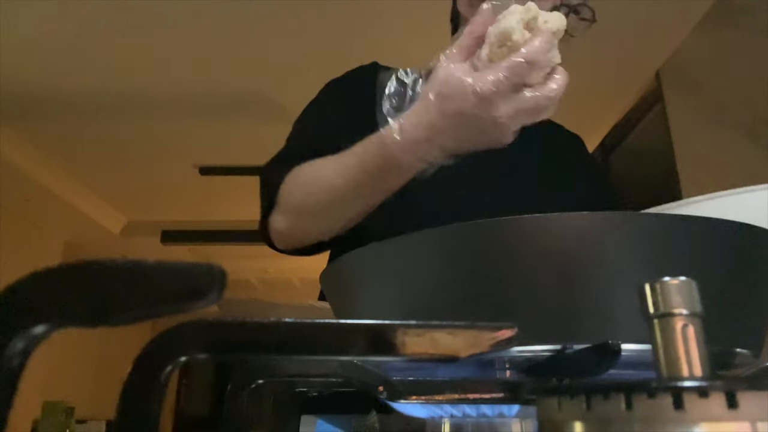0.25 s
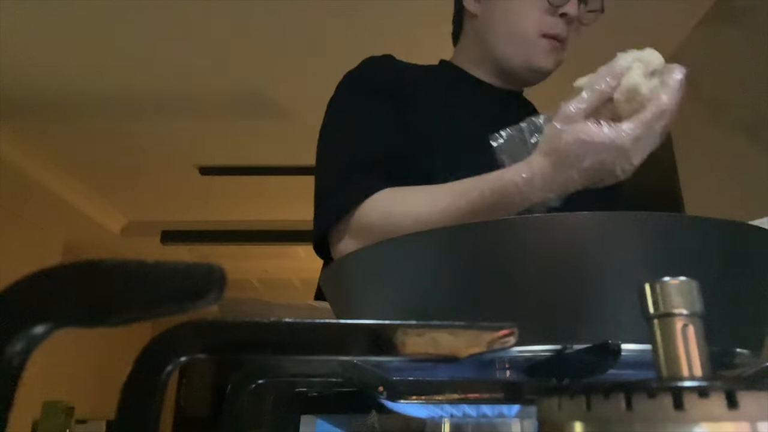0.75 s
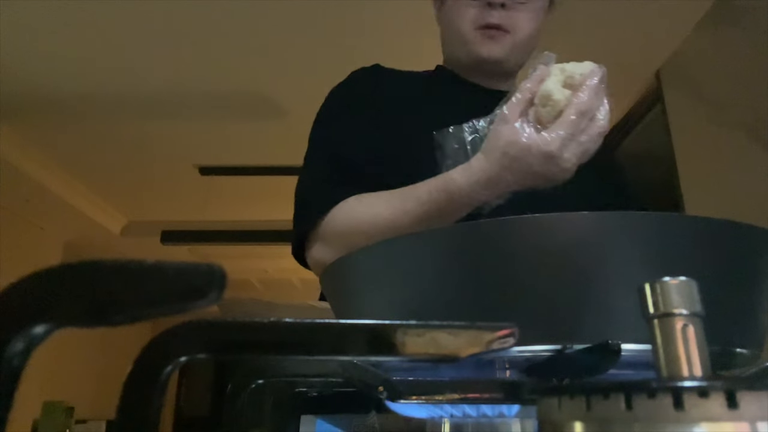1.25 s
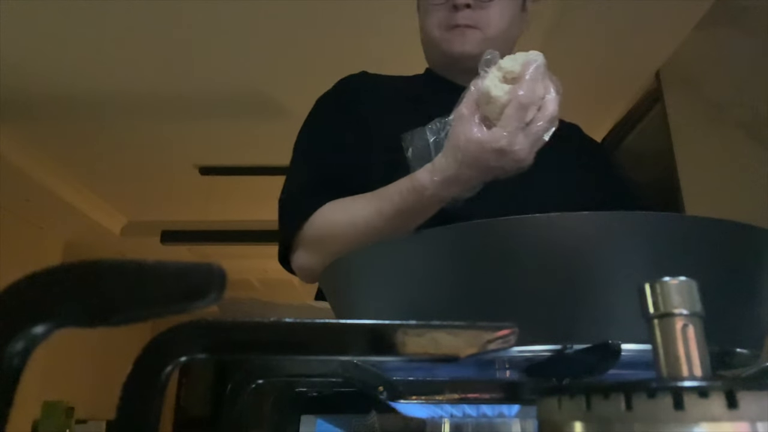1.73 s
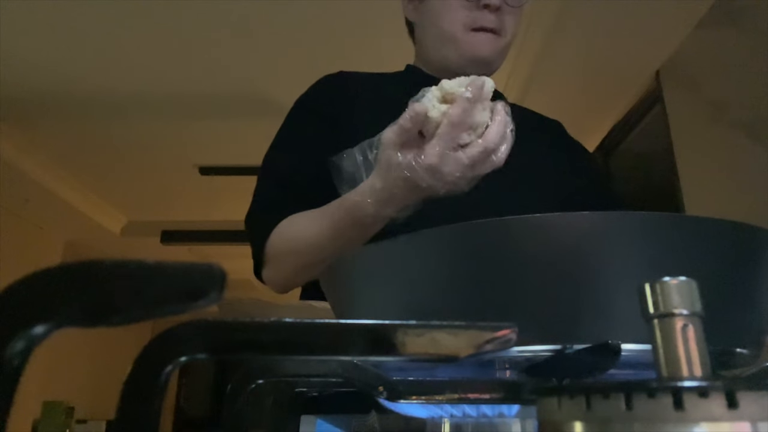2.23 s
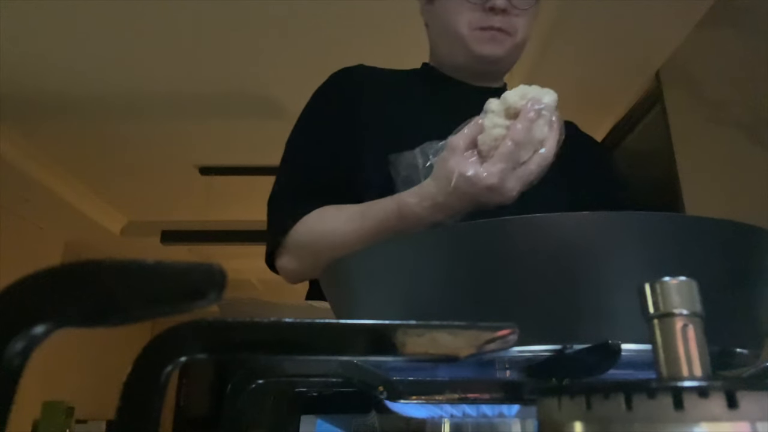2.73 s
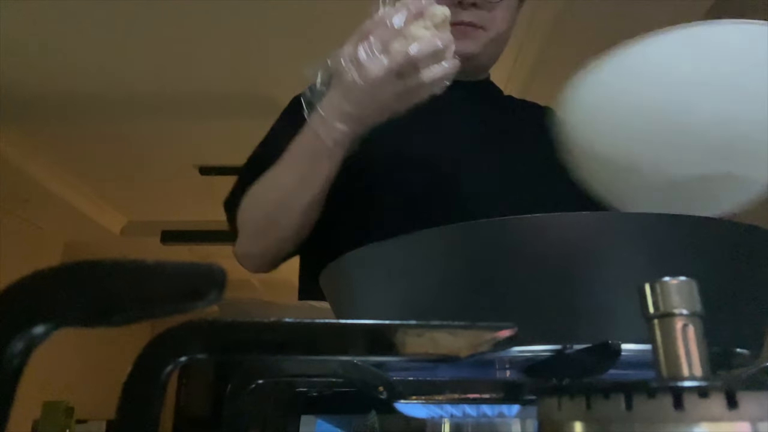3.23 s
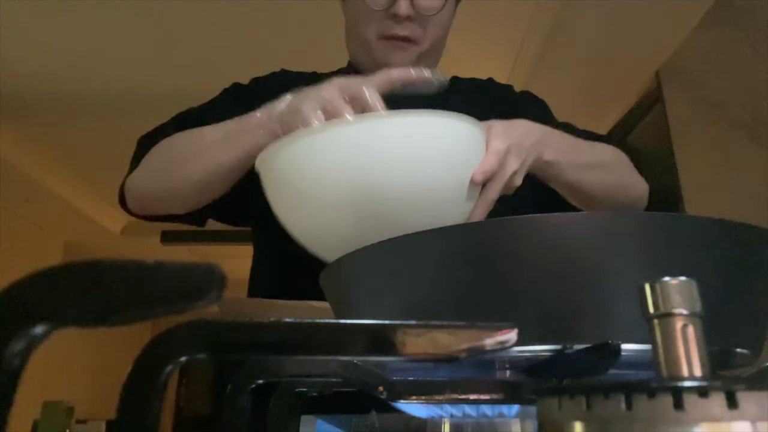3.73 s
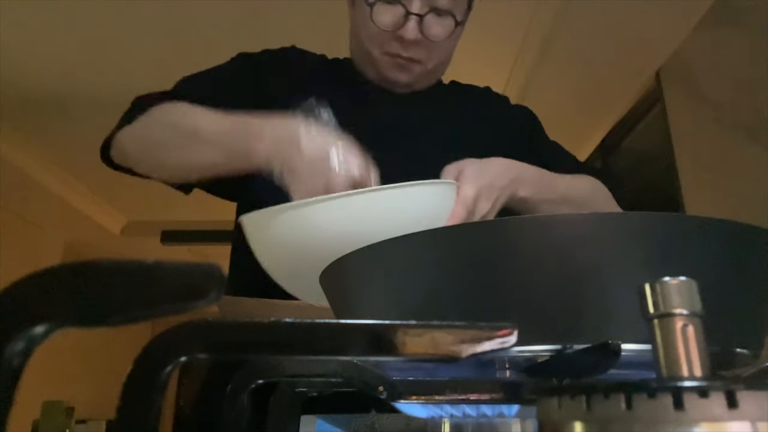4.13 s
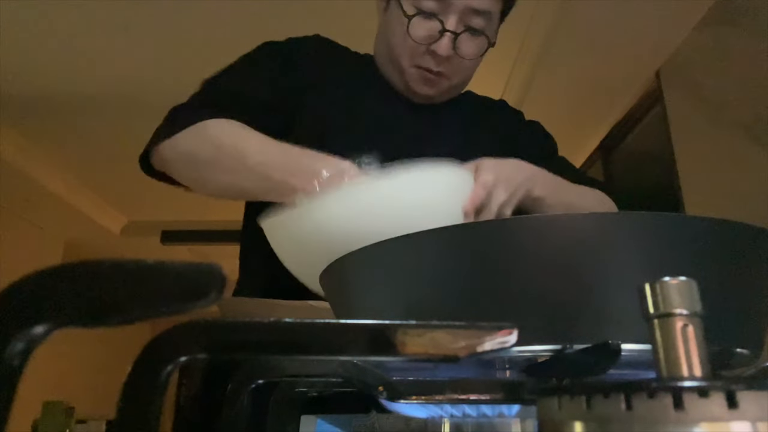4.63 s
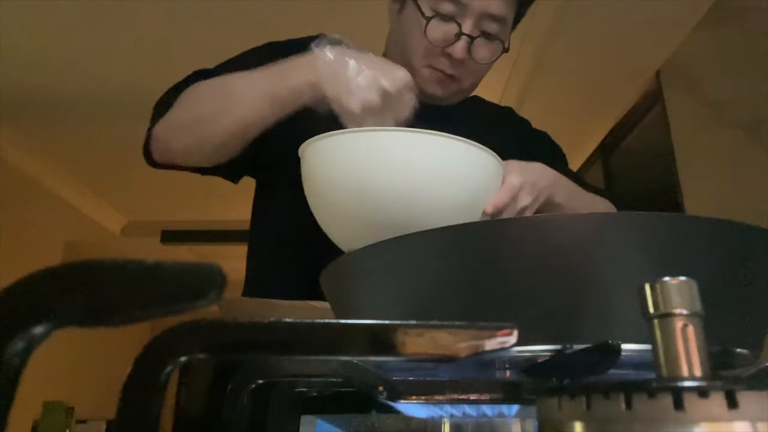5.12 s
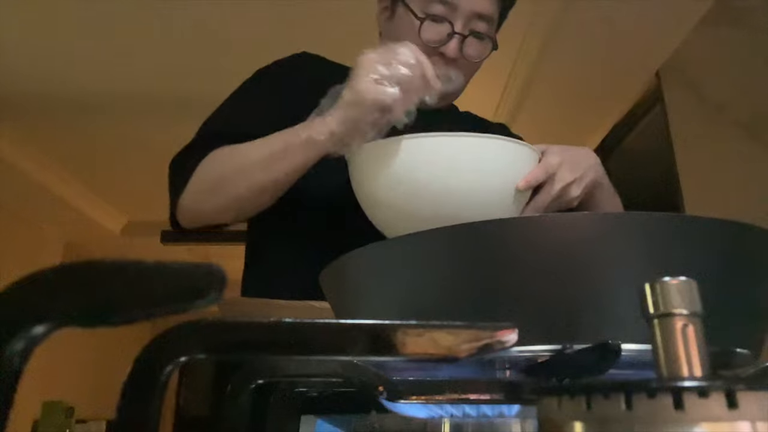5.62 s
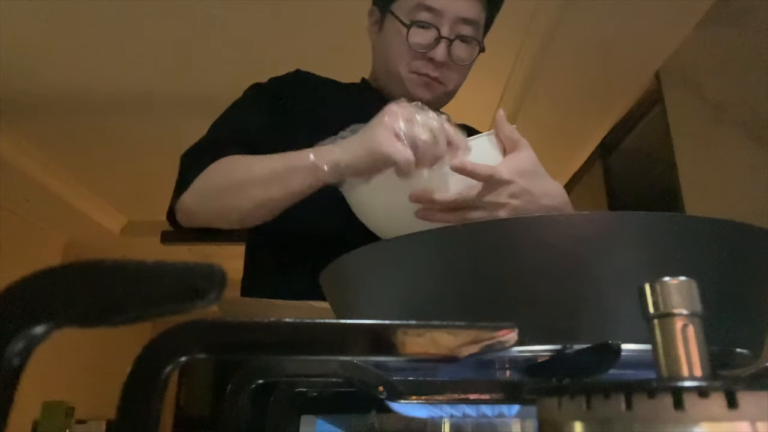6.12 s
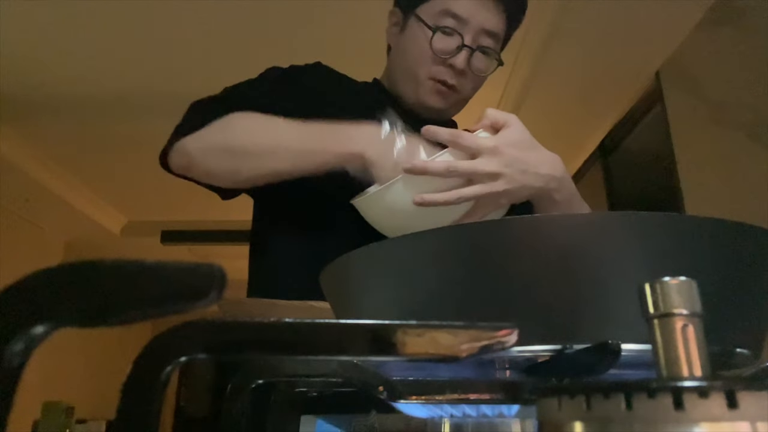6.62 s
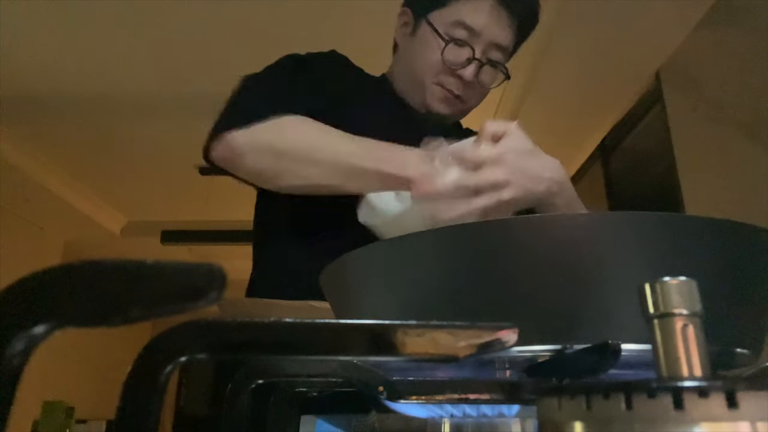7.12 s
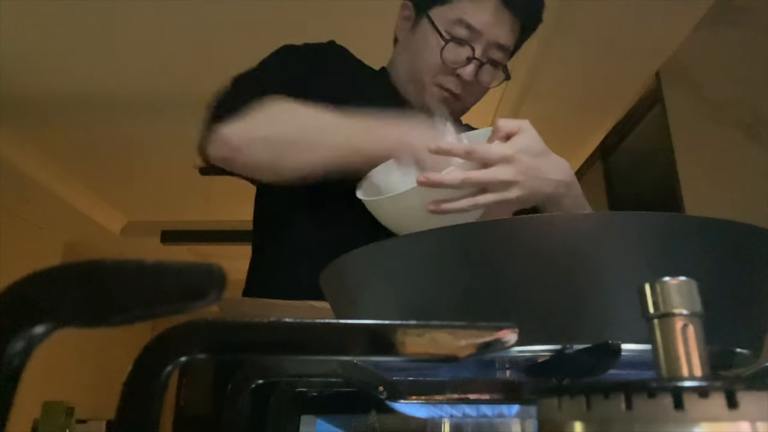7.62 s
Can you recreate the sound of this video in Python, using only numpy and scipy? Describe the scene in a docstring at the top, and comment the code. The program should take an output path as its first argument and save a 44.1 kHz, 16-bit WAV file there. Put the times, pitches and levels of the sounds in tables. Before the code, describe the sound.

Soft film-like glove rustle with sharp little crease snaps opens the scene, near the microphone. Just after one second a light plastic bowl clunks, scrapes and rocks with fast fading rebounds. Quieter squeezing follows, with a dull bump near three seconds. Then come two groups of rhythmic hollow plastic slaps, growing stronger, each trailed by crinkling and rubbing, with short close kitchen reflections and low room noise.

```python
"""Small kitchen: thin plastic gloves squeeze dough, a plastic bowl scrapes and knocks, dough lands in it.
Gloves: dense random creases, coloured as film, worked by each squeeze and wipe; single creases snap.
Bowl on the counter: scraping grains, struck modes, quickening rebounds.
Bowl in the hand: each landing of dough rings the wall, with a burst of crinkle and a short wipe.
Close reflections, a kitchen tail and a steady background surround them."""
import sys
import numpy as np
from scipy import signal
from scipy.fft import rfft, irfft
from scipy.io import wavfile

SR = 44100
rng = np.random.default_rng(int(sys.argv[2]) if len(sys.argv) > 2 else 0)


def unload_wav(signal):
    """Save mono or channel-first audio to the path in sys.argv[1] as 16-bit WAV at rate SR, clipped to [-1, 1]."""
    wavfile.write(
        sys.argv[1],
        SR,
        np.round(np.clip(np.atleast_2d(signal).T, -1, 1) * 32767).astype(np.int16),
    )


N = 346626
TIME_S = np.arange(N) / SR
MODE_TIME_S = TIME_S[:SR // 3]

# steady background spectrum: (frequency [Hz], density [dB per Hz])
AMBIENCE_SPECTRUM = [(25, -16.5), (52, 9), (100, 4.5), (170, -1.5), (280, 0.5), (550, -6), (900, -13),
                     (1400, 0), (2200, -9.5), (3200, -18), (5000, -25), (7500, -17.5), (10000, -13.5),
                     (15500, -26)]
AMBIENCE_LEVEL_DB = -63.5

# gloved hand closes on dough: (time [s], attack [s], hold [s], level [dB])
SQUEEZES = [(0.18, 0.028, 0.092, -48), (0.42, 0.025, 0.076, -51), (0.71, 0.095, 0.056, -48),
            (0.92, 0.025, 0.028, -55), (1.18, .03, 0.22, -63), (1.98, 0.0095, 0.26, -50),
            (2.38, 0.029, .17, -47.5), (2.955, .018, 0.04, -49), (3.15, 0.031, 0.0056, -48.5),
            (3.35, 0.026, .12, -57), (3.61, 0.067, 0.05, -39), (3.865, 0.069, 0.035, -40.5),
            (4.24, 0.036, 0.0091, -54), (5.48, 0.045, 0.16, -49.5), (5.70, 0.056, 0.16, -48),
            (5.963, 0.0045, 0.036, -43.5), (6.09, 0.034, .03, -51.5), (6.45, 0.011, 0.037, -48),
            (7.85, 0.0029, 0.042, -44.5)]
SQUEEZE_RELEASE_S, GLOVE_REST_DB = 0.057, -61
# glove turns from the microphone into the bowl: (time [s], share of muffled film [0-1])
GLOVE_SHADE = [(0, 0.6), (.9, 0.55), (2.0, 0.66), (3.0, 0.62), (3.7, 0.67), (7.86, 1)]
# film facing the microphone: (frequency [Hz], density [dB per Hz])
FILM_OPEN_SPECTRUM = [(100, -12), (280, -17), (550, -4), (900, 7.5), (1400, -2.5), (2200, -17), (3200, -1),
                      (5000, 3.5), (7500, -0.5), (10000, -2), (15500, 2.5)]
# muffled film: (frequency [Hz], density [dB per Hz])
FILM_SHADED_SPECTRUM = [(100, -16), (280, -4), (550, 1.5), (900, -4), (1400, 1.5), (2200, 0), (2900, -3),
                        (4200, -3), (7500, -3.5), (9000, -8), (15500, -15.5)]
TICKS_PER_S, TICK_SPREAD_DB, TICK_LEVEL_DB = 90, 6, -5.5
# single creases snapping through: (time [s], peak [dB])
CREASE_SNAPS = [(0.1284, -41.5), (0.282, -29.5), (0.348, -35), (0.5024, -28), (0.551, -37), (0.7013, -27.5),
                (0.782, -28.5), (0.803, -36), (1.183, -40.5), (1.205, -40), (2.3744, -33), (3.469, -37.5),
                (5.878, -36)]

# soft pushes on the bowl: (time [s], level [dB], frequency [Hz], t60 [s])
BOWL_BUMPS = [(0.019, -50.5, 248, .15), (1.116, -20, 606, 0.061), (1.117, -20.5, 269, 0.043),
              (2.802, -32, 137, 0.061), (4.926, -34, 233, 0.12), (4.935, -35.5, 105.6, 0.22),
              (5.728, -47, 126, 0.075)]

# bowl pushed over the counter: (time [s], hold [s], level [dB])
BOWL_SLIDES = [(1.17, .05, -45), (1.294, 0.12, -47.5), (1.379, 0.13, -45), (1.954, 0.43, -62.5),
               (2.735, 0.35, -57.5)]
SLIDE_ATTACK_S, SLIDE_RELEASE_S = 0.038, 0.055
# scraping foot: (frequency [Hz], density [dB per Hz])
SCRAPE_SPECTRUM = [(90, -6.5), (250, -0.5), (520, -1.5), (900, -2), (1350, -7), (2300, -6.5), (3200, -14.5),
                   (6000, -23.5), (12000, -58)]
# bowl comes down and rocks: (time [s], peak [dB], contact cut-off [Hz], favoured modes [Hz],
# their lift [dB], first rebound after [s], rebounds [count], loss per rebound [dB])
BOWL_KNOCKS = [(1.105, -21.5, 2800, 280, 6, .013, 2, 8.5), (1.300, -49, 3000, 2190, -1.5, 0, 0, 0),
               (1.391, -6, 2670, 905, 8.5, .0457, 7, 3.5), (1.657, -8, 1780, 523, 5, .037, 2, 9.5),
               (2.798, -18, 1500, 296, 4, 0, 0, 0)]
# modes of the bowl standing on the counter: (frequency [Hz], level [dB], t60 [s])
BOWL_DOWN_MODES = [(123, -22, 0.28), (163, -22.5, 0.18), (253.6, -21, 0.14), (317, -13, 0.14),
                   (389.5, -3.5, 0.07), (422.7, 0, 0.083), (513.4, -0.5, 0.054), (617.4, -2.5, 0.06),
                   (763, -1, 0.011), (911, -3.5, 0.029), (1020, -2.5, 0.027), (1067, -6, 0.022),
                   (1261, -0.5, 0.022), (1565, -3, 0.035), (1940, -2, 0.018), (2310, -6, 0.028),
                   (2850, -12, 0.037)]
# powers of the rebound number that shrink the gap and the contact cut-off
ROCK_GAP_POWER, ROCK_CUTOFF_POWER = .75, 0.48
ROCK_FOCUS_HZ, ROCK_FOCUS_DB = 380, 2.5   # rebounds favour the modes of the foot

# dough gathered from the wall: (time [s], hold [s], level [dB])
DOUGH_SCOOPS = [(3.619, 0.056, -45.5), (5.47, .08, -52.5), (6.447, 0.051, -50)]
# dough and fingers land, then wipe: (time [s], peak [dB], crinkle [dB], low modes [dB],
# favoured modes [Hz], their lift [dB], after-ring [dB], wipe after [s], its rustle [dB], its rubbing [dB])
DOUGH_SLAPS = [(3.668, -31.5, -46, -1, 750, 9, -28, .01, -46, -53),
               (4.044, -33, -32.5, -25, 1140, 25, -36, .055, -39.5, -39),
               (4.329, -23.5, -27, 1.5, 1140, -8, -47, 0.065, -43, -43),
               (4.615, -16, -25.5, -1.5, 1050, 0, -36, 0.068, -44, -47),
               (4.886, -11.5, -22.5, -4.5, 920, 15.5, -25, 0.077, -46.5, -43),
               (5.162, -11.5, -23.5, -30, 743, 12.5, -22, 0.058, -41, -67),
               (5.383, -41, -42, 2, 1320, 16, -36, .005, -46, -57),
               (5.725, -38, -42.5, 18, 250, 3, -29, 0.0016, -46, -49),
               (6.194, -41.5, -45, 2, 404, 5, -33, 0.049, -48.5, -67),
               (6.586, -33.5, -48, -23, 1150, 33, -18, 0.0025, -52, -52),
               (6.794, -15.5, -27, 0, 830, 11, -20.5, 0.09, -43.5, -40),
               (7.093, -14, -26.5, 0, 594, 5.5, -45, 0.07, -40.5, -39.5),
               (7.359, -10, -26.5, -3, 1040, 7.5, -39, 0.064, -42, -43),
               (7.623, -9.5, -24, -5, 1450, 11, -50, 0.056, -39.5, -41)]
# modes of the bowl held in the hand: (frequency [Hz], level [dB], t60 [s])
BOWL_HELD_MODES = [(112, -53, .12), (159, -36, 0.074), (262, -15, 0.13), (348, -16, 0.065),
                   (402.7, 0, 0.085), (503, -3, 0.027), (542, -9, 0.11), (610, 2.5, 0.026),
                   (684, -3.5, 0.071), (744, -16, 0.035), (856, -9.5, 0.072), (930, -26, 0.03),
                   (969, -4, 0.051), (1003, -1.5, 0.03), (1080, -21, 0.024), (1280, -13, 0.016),
                   (1694, -10, 0.013), (2060, -6, 0.007), (2520, -15.5, 0.015)]
# crushed glove: (frequency [Hz], density [dB per Hz])
SPLAT_SPECTRUM = [(300, 1.5), (1000, 11), (1800, -3), (2800, -3.5), (4000, 0.5), (5500, -2), (7300, 0),
                  (8500, -7), (12000, -7.5), (16000, -13)]
# dough rubbing the wall: (frequency [Hz], density [dB per Hz])
RUB_SPECTRUM = [(70, -15.5), (130, -17), (250, -4.5), (400, -4), (580, 3.5), (760, 0.5), (1020, 6.5),
                (1200, -1), (1450, -6.5), (3000, -26.5)]
# glove rustle outlasts the rubbing
WIPE_HOLD_S, WIPE_ATTACK_S, WIPE_RELEASE_S = 0.018, 0.031, 0.034
RUB_ATTACK_S, RUB_RELEASE_S = 0.012, 0.015

# reflections from counter, pan and hood: (delay [s], gain [ratio])
REFLECTIONS = [(.0036, 0.35), (.0053, 0.32), (.0087, 0.23), (0.0139, 0.098)]
# kitchen reverberation: (frequency [Hz], t60 [s])
KITCHEN_T60 = [(100, 0.79), (500, 0.51), (1500, 0.78), (5000, 0.63), (15000, 0.38)]
GLOVE_SEND_DB, KNOCK_SEND_DB, SLAP_SEND_DB, SPLAT_SEND_DB = -10.5, -12.0, -12.5, -11.0
BASS_CUT_HZ, TREBLE_CUT_HZ = 47.6, 16000


def from_db(db):
    """Decibels to amplitude gain."""
    return 10 ** (np.asarray(db) / 20)


def rms_one(x):
    """Scale to unit rms."""
    return x / np.sqrt(np.mean(x ** 2) + 1e-20)


def at_hz(points, hz):
    """Interpolate a table on a log-frequency axis."""
    table_hz, value = np.transpose(points)
    return np.interp(np.log(np.maximum(hz, 1)), np.log(table_hz), value)


def butter(x, hz, kind, order=2):
    """Causal Butterworth filter."""
    sos = signal.butter(order, np.clip(hz, 10, .45 * SR), kind, fs=SR, output="sos")
    return signal.sosfilt(sos, x)


def colour(x, spectrum):
    """Minimum-phase filter with the given spectrum, so clicks stay sharp; rms 1."""
    size = 4096
    bins_hz = np.arange(size // 2 + 1) * SR / size
    cepstrum = irfft(np.log(from_db(at_hz(spectrum, bins_hz))))
    # fold the cepstrum to its causal half: minimum phase
    cepstrum[1:size // 2] *= 2
    cepstrum[size // 2 + 1:] = 0
    impulse = irfft(np.exp(rfft(cepstrum)))
    return rms_one(signal.fftconvolve(x, impulse)[:len(x)])


def drift(rate_hz):
    """Random piecewise-linear curve, rms 1, with rate_hz new values a second."""
    return rms_one(np.interp(TIME_S * rate_hz, np.arange(4000), rng.standard_normal(4000)))


def add(out, time_s, sound):
    """Mix a sound in at a time."""
    start = max(round(time_s * SR), 0)
    out[start:start + len(sound)] += sound[:max(N - start, 0)]


def grains(per_s, spread_db):
    """Random tiny clicks, mostly weak with a few strong ones; rms 1."""
    sizes = from_db(spread_db * np.minimum(rng.exponential(1, N), 5))
    signed = sizes * rng.choice([-1, 1], N)
    return rms_one(signed * (rng.random(N) < per_s / SR))


def ring(hz, t60_s):
    """One struck mode: a third of a second of decaying sine."""
    decay = from_db(-60 * MODE_TIME_S / max(t60_s, .003))
    return np.sin(2 * np.pi * hz * MODE_TIME_S) * decay


def strike(modes, gains_db):
    """All modes of a body struck together; neighbours swing in opposite senses."""
    out = 0
    for k, (hz, db, t60_s) in enumerate(modes):
        out = out + (-1) ** k * from_db(db + gains_db[k]) * ring(hz, t60_s)
    return out


def favoured(mode_hz, focus_hz):
    """Weight 0-1 of the modes that a point of contact excites best."""
    return np.exp(-(np.log2(mode_hz / focus_hz) / 0.33) ** 2)


def strokes(rows, release_s):
    """Gain of movements (s, attack s, hold s, dB): exponential swell, hold, exponential decay; powers add."""
    t, power = TIME_S[::32], 0
    for time_s, attack_s, hold_s, db in rows:
        before = np.maximum(time_s - t, 0) / max(attack_s, .001)
        after = np.maximum(t - time_s - hold_s, 0) / release_s
        power = power + (from_db(db) * np.exp(-before - after)) ** 2
    return np.interp(TIME_S, t, np.sqrt(power))


def ambience():
    """Steady kitchen background: coloured noise."""
    return from_db(AMBIENCE_LEVEL_DB) * colour(rng.standard_normal(N), AMBIENCE_SPECTRUM)


def flexing():
    """How hard the film is worked: by squeezes, by the wipe after each slap, and a little at rest."""
    squeezes = strokes(SQUEEZES, SQUEEZE_RELEASE_S)
    wipe_rows = [(s + after_s, WIPE_ATTACK_S, WIPE_HOLD_S, db) for s, *_, after_s, db, _ in DOUGH_SLAPS]
    wipes = strokes(wipe_rows, WIPE_RELEASE_S)
    return np.sqrt(squeezes ** 2 + wipes ** 2 + from_db(GLOVE_REST_DB) ** 2)


def crease_snaps():
    """Single creases snap through: short bright noise bursts."""
    out, t = np.zeros(N), TIME_S[:SR // 100]
    for time_s, peak_db in CREASE_SNAPS:
        burst = rng.standard_normal(len(t)) * np.exp(-t / 0.0017)
        snap = butter(burst, 2000, "high", order=1)
        add(out, time_s, from_db(peak_db) * snap / np.abs(snap).max())
    return out


def gloves():
    """Thousands of creases a second buckle in clumps and merge into a rustle; a few snap loudly."""
    rustle = grains(per_s=5000 * from_db(3.8 * drift(45)), spread_db=1.5)
    # wide folds and fine wrinkles flutter independently
    folds = butter(rustle, 3800, "low", order=1)
    wrinkles = rustle - folds
    rustle = folds * from_db(2.0 * drift(50)) + wrinkles * from_db(2.06 * drift(70))
    shade = np.interp(TIME_S, *np.transpose(GLOVE_SHADE))
    film = (1 - shade) * colour(rustle, FILM_OPEN_SPECTRUM) + shade * colour(rustle, FILM_SHADED_SPECTRUM)
    # smallest creases tick in the treble, clearest when facing the microphone
    ticks = (1 - 0.67 * shade) * butter(grains(TICKS_PER_S, TICK_SPREAD_DB), 7000, "high")
    return flexing() * (film + from_db(TICK_LEVEL_DB) * ticks) + crease_snaps()


def bumps():
    """A soft push sets only one low mode of the bowl swinging."""
    out = np.zeros(N)
    soft_onset = np.clip(MODE_TIME_S / 0.0023, 0, 1)
    for time_s, db, hz, t60_s in BOWL_BUMPS:
        add(out, time_s, from_db(db) * ring(hz, t60_s) * soft_onset)
    return out


def contacts():
    """Each knock and its rebounds, which come ever sooner, weaker and duller."""
    rows = []
    for time_s, db, contact_hz, focus_hz, focus_db, gap_s, rebounds, loss_db in BOWL_KNOCKS:
        rows.append((time_s, db, contact_hz, focus_hz, focus_db))
        for k in range(1, round(rebounds) + 1):
            time_s = time_s + gap_s / k ** ROCK_GAP_POWER
            cutoff_hz = contact_hz / (k + 1) ** ROCK_CUTOFF_POWER
            rows.append((time_s, db - k * loss_db, cutoff_hz, ROCK_FOCUS_HZ, ROCK_FOCUS_DB))
    return rows


def sliding():
    """How hard the foot of the bowl scrapes: it catches and slips during each push."""
    rows = [(s, SLIDE_ATTACK_S, hold_s, db) for s, hold_s, db in BOWL_SLIDES]
    return strokes(rows, SLIDE_RELEASE_S) * from_db(2.7 * drift(45))


def bowl_on_counter():
    """The foot of the bowl scrapes, knocks and rocks to rest; a softer contact is duller."""
    out, hits = np.zeros(N), contacts()
    mode_hz = np.array(BOWL_DOWN_MODES)[:, 0]
    scrape = sliding() * colour(grains(per_s=700, spread_db=1.0), SCRAPE_SPECTRUM)
    chance = rng.standard_normal((len(hits), len(mode_hz)))
    for (time_s, db, contact_hz, focus_hz, focus_db), luck in zip(hits, chance):
        gains_db = 1.86 * luck + focus_db * favoured(mode_hz, focus_hz)
        knock = butter(strike(BOWL_DOWN_MODES, gains_db), contact_hz, "low")
        burst = rng.standard_normal(len(knock)) * np.exp(-MODE_TIME_S / 0.009)
        tick = butter(burst, 2.03 * contact_hz, "low")
        add(out, time_s, from_db(db) * (knock / np.abs(knock).max() + from_db(-20.5) * tick))
    return out + scrape


def rubbing():
    """How hard the dough is pressed along the wall: in each scoop and in the wipe after each slap."""
    wipes = [(s + after_s, WIPE_HOLD_S, db) for s, *_, after_s, _, db in DOUGH_SLAPS]
    rows = [(s, RUB_ATTACK_S, hold_s, db) for s, hold_s, db in [*DOUGH_SCOOPS, *wipes]]
    return strokes(rows, RUB_RELEASE_S)


def splat_and_rub():
    """A slap crushes the glove all at once; then the dough is wiped along the wall."""
    crush = np.zeros(N)
    burst = (1 - np.exp(-MODE_TIME_S / 0.0026)) ** 2 * np.exp(-MODE_TIME_S / 0.014)
    for time_s, _, crinkle_db, *_ in DOUGH_SLAPS:
        add(crush, time_s - .002, from_db(crinkle_db) * burst / burst.max())
    splat = crush * colour(grains(per_s=14000, spread_db=3.5), SPLAT_SPECTRUM)
    # tacky dough sticks and lets go, so the wipe comes in clumps
    slips = grains(per_s=1100 * from_db(4.7 * drift(70)), spread_db=2.0)
    return splat + rubbing() * colour(slips, RUB_SPECTRUM)


def dough_on_bowl():
    """Each slap rings the wall of the bowl; where it lands decides which modes speak."""
    out, mode_hz = np.zeros(N), np.array(BOWL_HELD_MODES)[:, 0]
    chance = rng.standard_normal((len(DOUGH_SLAPS), len(mode_hz)))
    for row, luck in zip(DOUGH_SLAPS, chance):
        time_s, db, _, bass_db, focus_hz, focus_db, after_db, *_ = row
        gains_db = .5 * luck + bass_db * (mode_hz < 450) + focus_db * favoured(mode_hz, focus_hz)
        wall = strike(BOWL_HELD_MODES, gains_db)
        # a stiff, glancing contact moves little air in the bass
        wall = butter(wall, 85 * from_db(-.5 * bass_db), "high")
        # the hollow rings on in a band of crowded resonances
        noise = rng.standard_normal(len(MODE_TIME_S))
        hollow = rms_one(butter(noise, focus_hz * np.array([.8, 1.08]), "band"))
        after = hollow * from_db(after_db - 60 * MODE_TIME_S / 0.26)
        add(out, time_s, from_db(db) * (wall / np.abs(wall).max() + after))
    return out


def nearby(x, top_hz):
    """Close surfaces repeat a sound within milliseconds, a little duller."""
    out, dull = x.copy(), butter(x, top_hz, "low", order=1)
    for delay_s, gain in REFLECTIONS:
        add(out, delay_s, gain * dull)
    return out


def kitchen(x):
    """A diffuse tail builds up quickly, each band dying at its own rate."""
    t, edges_hz = TIME_S[:SR], np.geomspace(50, 18000, 10)
    # evenly spread echoes: equal strength at every frequency, random phase
    echoes = rms_one(irfft(np.exp(2j * np.pi * rng.random(SR // 2 + 1))))
    tail = 0
    for k, (low_hz, high_hz) in enumerate(zip(edges_hz, edges_hz[1:])):
        fade = from_db(-60 * t / at_hz(KITCHEN_T60, np.sqrt(low_hz * high_hz)))
        shifted = np.roll(echoes, k * len(t) // len(edges_hz))
        tail = tail + butter(shifted, [low_hz, high_hz], "band") * fade
    tail = tail * np.clip((t - .005) / 0.0067, 0, 1)
    return signal.fftconvolve(x, tail / np.sqrt(np.sum(tail ** 2)))[:N]


def scene():
    """Gloves, bowl and dough in the kitchen, over its steady background."""
    background, glove = ambience(), gloves()
    knocks = nearby(bowl_on_counter(), top_hz=2470)
    splat = splat_and_rub()
    slaps = nearby(dough_on_bowl(), top_hz=2620) + bumps()
    send = from_db(GLOVE_SEND_DB) * glove + from_db(KNOCK_SEND_DB) * knocks
    send = send + from_db(SLAP_SEND_DB) * slaps + from_db(SPLAT_SEND_DB) * splat
    return (glove + splat + knocks + slaps + kitchen(send) + background)[None]


def record(dry):
    """The microphone drops the deepest bass and the top is cut steeply."""
    thin = butter(dry, BASS_CUT_HZ, "high", order=8)
    return signal.sosfilt(signal.ellip(10, .1, 80, TREBLE_CUT_HZ, fs=SR, output="sos"), thin)


dry = scene()
out = record(dry)
unload_wav(out)
```